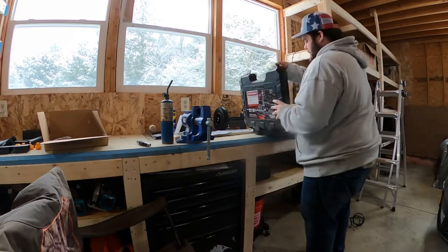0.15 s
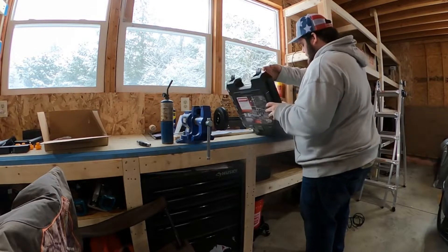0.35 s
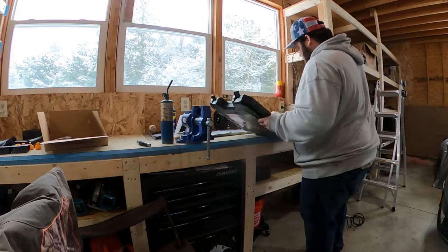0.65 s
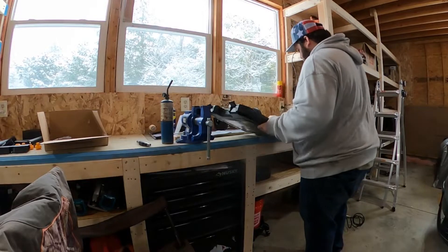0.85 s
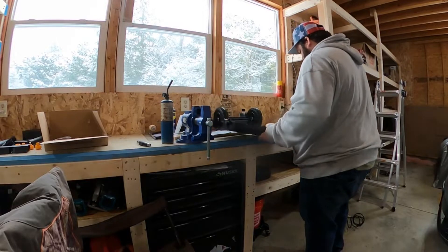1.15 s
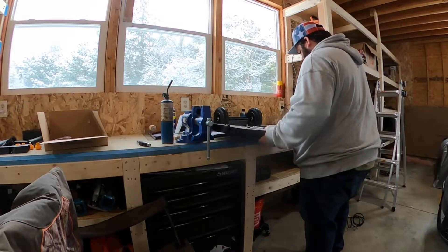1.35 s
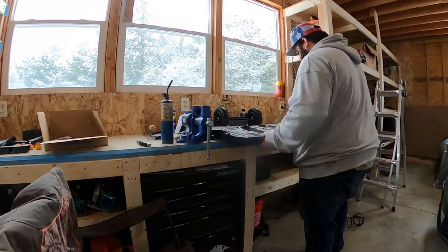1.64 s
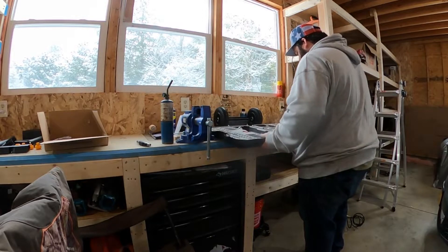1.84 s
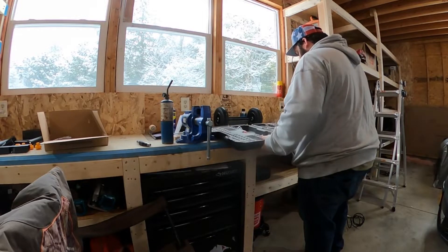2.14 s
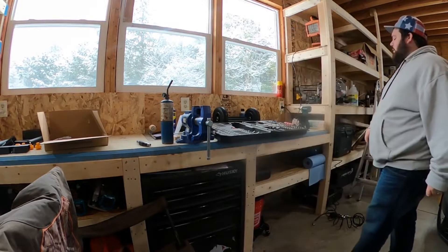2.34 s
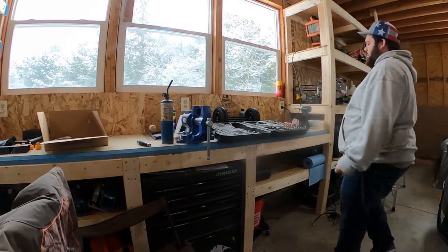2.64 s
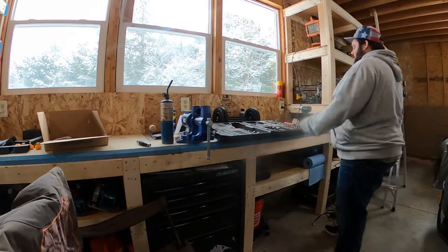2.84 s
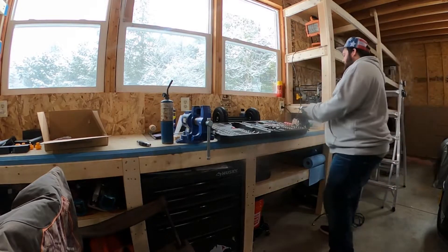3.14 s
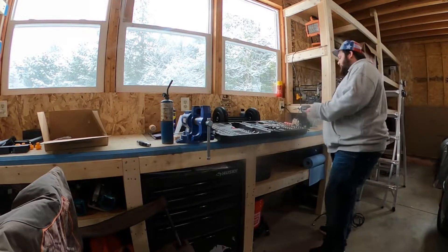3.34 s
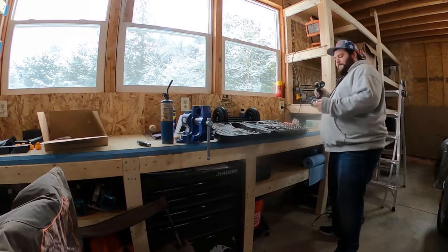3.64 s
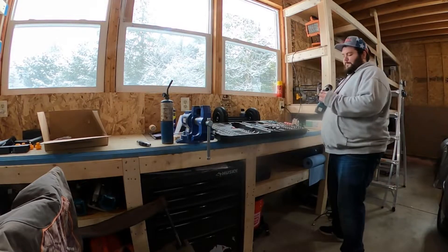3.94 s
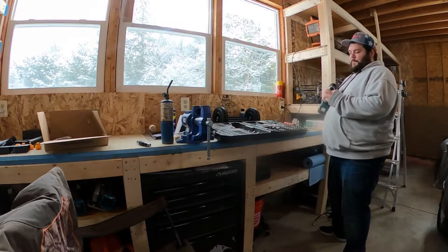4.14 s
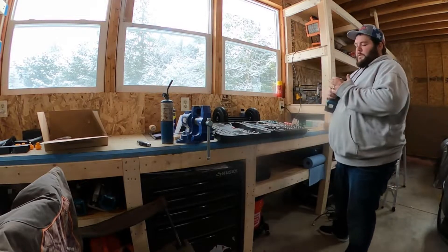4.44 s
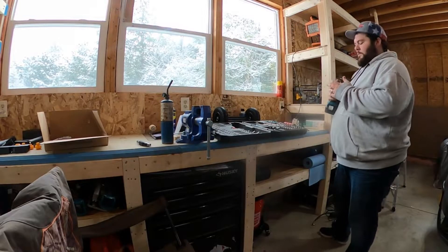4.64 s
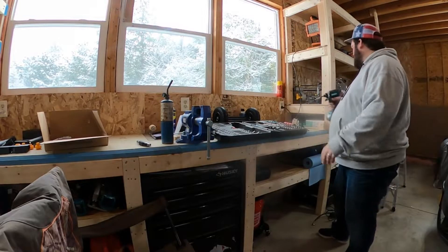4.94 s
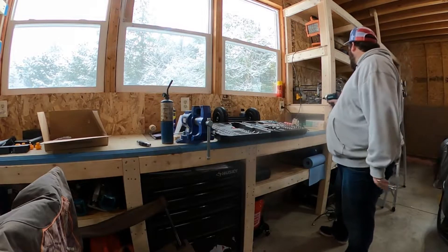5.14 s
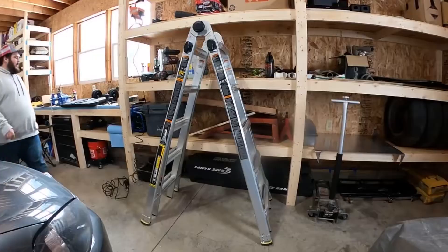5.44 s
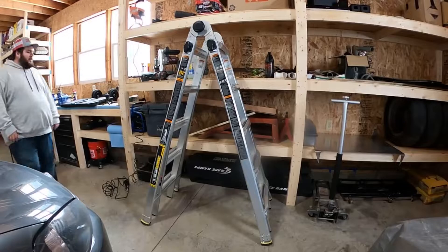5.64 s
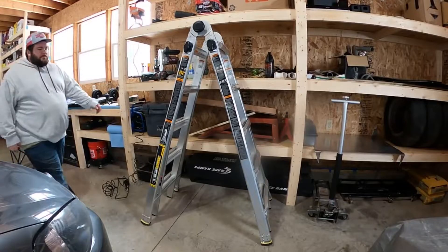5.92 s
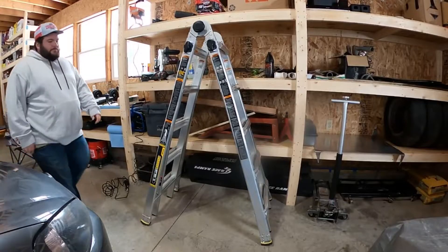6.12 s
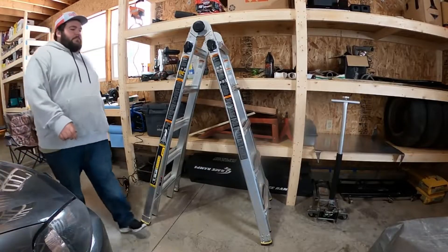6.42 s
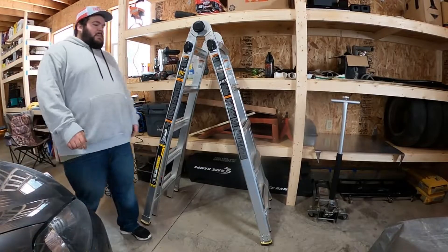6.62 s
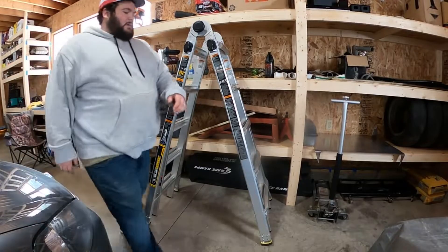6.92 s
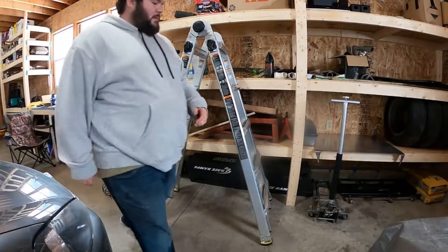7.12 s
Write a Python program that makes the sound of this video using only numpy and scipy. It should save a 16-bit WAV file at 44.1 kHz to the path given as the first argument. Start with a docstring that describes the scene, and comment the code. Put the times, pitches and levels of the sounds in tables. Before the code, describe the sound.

Close to a wooden workbench in a small garage, a hollow plastic case is dragged and bumped with a loose socket pinging. It is set down with clicks, clinks and a heavy knock. Cloth rustles, a tool is picked up, and a part snaps home with a loud, bright metallic crack. The ringing cuts off, and four gritty footsteps cross concrete with a hissing swish.

```python
"""Close by on a wooden workbench a plastic socket case is dragged and bumped, a loose socket ringing inside.
It is laid down, unlatched and opened to clinks; then a tool is picked up and a part snaps home in it.
Last, shoes scuff and step over the garage's concrete, with a long swish as the walker turns.
Contacts are noise bursts through resonant bodies, slides are grainy noise, steel and hollow rings are fading tones.
Three stretches follow one another; at the end of each, the ringing of the blows stops abruptly."""
import sys
import numpy as np
from scipy import signal
from scipy.fft import rfft, irfft, next_fast_len
from scipy.io import wavfile
from scipy.ndimage import uniform_filter1d, minimum_filter1d, map_coordinates

SR = 44100
rng = np.random.default_rng(int(sys.argv[2]) if len(sys.argv) > 2 else 0)


def waveform_to_disk(signal):
    """Save audio, clipped to [-1, 1], as 16-bit WAV at the path in sys.argv[1]."""
    frames = np.transpose(np.atleast_2d(signal))
    scaled = np.clip(frames, -1, 1) * 32767
    samples = np.round(scaled).astype(np.int16)
    wavfile.write(sys.argv[1], SR, samples)


N = 320646
HZ = np.fft.rfftfreq(SR, 1 / SR)
T = np.arange(SR) / SR  # one second, the longest single sound


def amp(db):
    """Decibels to gain."""
    return 10 ** (np.asarray(db) / 20)


def unit(x):
    """Scale to rms 1."""
    return x / np.sqrt(np.mean(x ** 2) + 1e-20)


def along(points, hz):
    """Read (Hz, value) points on a log frequency axis."""
    f, v = np.transpose(points)
    return np.interp(np.log(hz + 1), np.log(f + 1), v)


def octaves(hz, centre_hz):
    """Octaves above a centre, levelling off in the deep bass and the far treble."""
    return np.log2(np.clip(hz, 200, 10000) / centre_hz)


def wobble(rate, size=N):
    """A smooth random curve, rate knots a second."""
    knots = rng.standard_normal(int(size * rate / SR) + 4)
    return map_coordinates(knots, [np.arange(size) * rate / SR])


def filtered(x, response):
    """Multiply the spectrum of x by a response of frequency."""
    size = x.shape[-1]
    m = next_fast_len(size + 8192)
    return irfft(rfft(x, m) * response(np.fft.rfftfreq(m, 1 / SR)), m)[..., :size]


def colour(spectrum, modes, hz):
    """Gain of a body: its broad spectrum with resonances on top."""
    peaks_db = sum(db / (1 + (2 * (hz - f) / w) ** 2) for f, w, db in modes)
    return amp(along(spectrum, hz) + peaks_db)


def causal(gain):
    """The minimum-phase response with this gain: it rings only after the blow."""
    cepstrum = irfft(np.log(np.maximum(gain, gain.max() * 1e-5)))
    cepstrum[1:SR // 2] *= 2
    cepstrum[SR // 2 + 1:] = 0
    return np.exp(rfft(cepstrum))


def add(track, s, sound):
    """Lay a sound in at time s, up to the end of its stretch."""
    # stretches of the scene: start/s, end/s
    stretches = [(0, 2.2012), (2.2012, 5.2007), (5.2007, 7.28)]
    end = min(N, round(SR * next(b for a, b in stretches if s < b)))
    start = max(0, round(s * SR))
    part = sound[:, :end - start]
    track[:, start:start + part.shape[1]] += part


def blows(rows, spectrum, modes, grain, rattle_t60, crack, ring_db, echo_s, echo_db, direct_side_db, level_db):
    """Each contact is a crack and a short grainy rattle through the body, answered by a near wall and the room."""
    focus_db = 4.5  # per octave: a blow's colour falls away from the resonance it favours
    thud_hz = 380  # weight is felt below this
    track = np.zeros((2, N))
    for s, db, ring_hz, hardness_db, thud_db, room_db in rows:
        chatter = rng.standard_normal((2, SR)) * np.exp(grain * rng.standard_normal(SR))
        rattle = unit(chatter * amp(-60 * T / rattle_t60))
        snap = unit(rng.standard_normal((2, SR)) * np.exp(-T / 0.0016))
        late = np.maximum(T - echo_s, 0)
        wall = unit(rng.standard_normal((2, SR)) * (late > 0) * np.exp(-late / 0.013))
        # mid and side: the direct sound has its own side level, the room comes from all around
        contact = unit(rattle + crack * snap + amp(echo_db) * wall) * amp([[0], [direct_side_db]])
        room = amp(room_db) * garage()
        # where the body is struck favours one resonance; hardness brightens it and weight adds a thud
        body = colour(spectrum, [*modes, (ring_hz, ring_hz / 11, ring_db)], HZ)
        away = octaves(HZ, ring_hz)
        thud = thud_db / (1 + (HZ / thud_hz) ** 4)
        tilt = amp(hardness_db * away - focus_db * abs(away) + thud)
        sound = irfft(rfft(contact + room) * causal(unit(body * tilt)))
        add(track, s, amp(db + level_db) * sound)
    return track


def settling(count):
    """Rows of small random clacks as loose sockets shift in the tipping and landing case, rising in level."""
    start_s, end_s, first_db, last_db = 1.45, 2.12, -46, -40
    rows = []
    for u, p, v in rng.random((count, 3)):
        s = start_s + u * (end_s - start_s)
        db = first_db + u * (last_db - first_db) + 8 * (v - 0.5)
        rows.append((s, db, 2400 * 2 ** p, -1, 0, -9))
    return rows


def ringing(rows, modes, level_db):
    """The sharp part of each contact sets steel ringing, every mode at a new strength."""
    sharp_hz = 3000  # contacts well below this excite little ringing
    track, t = np.zeros((2, N)), T[:SR // 2]
    hz, db, t60 = np.transpose(modes)[:, :, None]
    tones = amp(db - 60 * t / t60) * np.exp(2j * np.pi * hz * t) * (1 - np.exp(-t / 0.001))
    for s, blow_db, ring_hz, *rest in rows:
        sharpness = 1 / np.hypot(1, (sharp_hz / ring_hz) ** 2)
        phase = np.exp(2j * np.pi * rng.random((2, len(modes))))
        strength = amp(rng.normal(0, 2.1, (2, len(modes)))) * phase
        add(track, s, sharpness * amp(blow_db + level_db) * (strength @ tones).real)
    return track


def socket():
    """A loose steel socket is touched and rings on in a few fading modes."""
    # modes of the socket: f/Hz, level/dB, t60/s
    steel = [(7560, -2, 0.26), (9700, -20, 0.45), (14340, -41, 0.33)]
    # touches of the socket: t/s, level/dB
    pings = [(0.410, -35.5), (0.446, -39), (0.56, -56)]
    track = np.zeros((2, N))
    for s, db in pings:
        ring = 0
        for hz, level, t60 in steel:
            ring = ring + amp(level - 60 * T / t60) * np.sin(2 * np.pi * (hz * T + rng.random((2, 1))))
        add(track, s, amp(db) * ring * (1 - np.exp(-T / 0.0028)))
    return track


def booms(rows, width_share, rise_s):
    """Single resonances swell and fade, their phase drifting."""
    track = np.zeros((2, N))
    for s, hz, db, t60 in rows:
        width = 25 + width_share * hz  # sets both the phase drift and the band
        drift = np.cumsum(rng.standard_normal((2, SR)), axis=1) * np.sqrt(width / SR)
        tone = np.sin(2 * np.pi * hz * T + 2 * drift)
        tone = filtered(tone, lambda f: 1 / (1 + ((f - hz) / (2 * width)) ** 4))
        add(track, s, tone * amp(db - 60 * T / t60) * (1 - np.exp(-T / rise_s)))
    return track


def stroke(length_s):
    """Envelope of a sliding movement: attack, hold, release."""
    attack_s, release_s = 0.022, 0.085  # release: time to fall to 1/e
    return np.clip(T / attack_s, 0, 1) * np.exp(-np.maximum(T - length_s, 0) / release_s)


def rubbing(rows, spectrum, modes, grain_db, grain_rate, level_db):
    """Sliding contact catches and slips in small grains, each stroke with its own brightness."""
    track = np.zeros((2, N))
    for s, length_s, db, bright_db in rows:
        grains_db = grain_db * wobble(grain_rate, size=SR) + 0.52 * wobble(900, size=SR)
        slips = rng.standard_normal((2, SR)) * amp(grains_db)
        rub = filtered(slips, lambda hz: colour(spectrum, modes, hz) * amp(bright_db * octaves(hz, 1000)))
        add(track, s, amp(db + level_db) * unit(rub) * stroke(length_s))
    return track


def footfalls(count):
    """Rows of contacts: each shoe rolls from heel to toe and cracks a few grains of grit on the way."""
    # footfalls: t/s, level/dB, time from heel to toe/s, extra weight/dB
    steps = [(5.365, -35, 0.063, -3), (5.884, -33.5, 0.069, 4.5), (6.436, -32.5, 0.055, -2),
             (6.958, -31, 0.08, 7)]
    # heel, ball and toe: share of the roll, level/dB re the step, resonance f/Hz,
    # hardness/(dB per octave), thud/dB before the extra weight, room/dB
    roll = [(0, 1.5, 276, -1.5, -8, -2.5), (0.35, -3.5, 613, -1.5, -13.5, 0.5),
            (0.998, -1.5, 620, -4, -8, -5.5)]
    crunch_db, crunch_hz = -12, 880  # grit: level re the step, middle of its two-octave range
    rows = []
    for s, db, roll_s, weight_db in steps:
        for share, part_db, hz, hardness_db, thud_db, room_db in roll:
            rows.append((s + share * roll_s, db + part_db, hz, hardness_db, thud_db + weight_db, room_db))
        for u, p in rng.random((count, 2)):
            rows.append((s + (0.1 + u) * roll_s, db + crunch_db, crunch_hz * 2 ** (2 * p - 1), -1.5, -8, -8))
    return rows


def swish():
    """A narrow, hissing slide in two resonances that swells and sinks as the walker turns."""
    # resonances of the slide: f/Hz, width/Hz, level/dB
    slide_modes = [(3000, 1300, 0), (4360, 520, 13.5)]
    broad = [(500, -36), (3000, 4.5), (5000, -7.5), (12000, -24), (15000, -55)]  # f/Hz, level/dB
    start_s, length_s, peak_db = 5.62, 0.3, -41.5
    track = np.zeros((2, N))
    hiss = filtered(rng.standard_normal((2, SR)), lambda hz: colour(broad, slide_modes, hz))
    swell = np.sin(np.pi * np.minimum(T / length_s, 1)) ** 2
    add(track, start_s, unit(hiss) * swell * amp(peak_db + 0.72 * wobble(90, size=SR)))
    return track


def garage():
    """A fresh mid and side room tail of rms 1; each frequency dies at its own speed."""
    # reverberation of the garage: f/Hz, t60/s
    decay = [(100, 0.42), (300, 0.38), (1200, 0.56), (5000, 0.54), (8000, 0.43), (14000, 0.22)]
    hz, t, z = signal.stft(rng.standard_normal((2, SR)), SR, nperseg=256)
    fading = z * amp(-60 * t / along(decay, hz)[:, None])
    tail = signal.istft(fading, SR, nperseg=256)[1][:, :SR]
    return unit(tail * (1 - np.exp(-T / 0.0057)))


def air(level_db, rumble_db):
    """The still garage: faint hiss over a deep rumble that rises and falls, with a low thump near 2.9 s."""
    # colour of the hiss: f/Hz, level/dB
    hiss_colour = [(20, -8), (90, -12.5), (180, -2.5), (600, -9.5), (900, -17.5), (1300, -9), (6000, -20),
                   (10000, -31), (15000, -63.5)]
    # course of the deep rumble: t/s, level/dB
    rumble = [(0.0, -65), (0.32, -59), (0.77, -77), (1.9, -58), (2.85, -75), (2.89, -49), (3.1, -77),
              (5.34, -80.5), (5.41, -70), (5.71, -84), (5.91, -65), (6.34, -73.5), (6.46, -62.5),
              (6.86, -76), (6.94, -67), (7.27, -62.5)]
    deep_colour = [(12, -22.0), (25, 3), (65, -2.5), (130, -41.5)]  # f/Hz, level/dB
    hiss = unit(filtered(rng.standard_normal((2, N)), lambda hz: amp(along(hiss_colour, hz))))
    deep = unit(filtered(rng.standard_normal((2, N)), lambda hz: amp(along(deep_colour, hz))))
    course_db = np.interp(np.arange(N) / SR, *np.transpose(rumble))
    return amp(level_db + 1.5 * wobble(1.97)) * hiss + amp(course_db + rumble_db) * deep


def spread(x, side_db):
    """Mid and side to left and right; the close microphone pair keeps the bass near mono."""
    # width of the pair: f/Hz, level of side re mid/dB before the layer's own side_db
    width = [(50, -26), (130, -14.5), (300, -16.5), (700, -26), (1200, -9), (2400, -6.5), (4400, -11.5),
             (8000, -5.5), (13000, -11)]
    mid, side = x[0], filtered(x[1], lambda hz: amp(along(width, hz) + side_db))
    return np.array([mid + side, mid - side])


def scene():
    """The case is straight ahead of the microphones; hands, feet and the garage's own air are more diffuse."""
    # the case bumps the bench: t/s, level/dB before the layer's level_db, favoured resonance f/Hz,
    # hardness/(dB per octave), thud/dB, room/dB
    knocks = [(0.074, -26.5, 920, -3, -10, 5), (0.163, -24.5, 600, -1.5, 9, -1),
              (0.184, -16, 193, -1.5, -11.5, -2), (0.215, -21.5, 274, -2, 4, -3),
              (0.261, -25.5, 606, -0.5, 15, -2), (0.315, -27.5, 252, -6.5, -2, 0),
              (0.378, -21, 208, -4, -6.5, -2.5), (0.507, -24, 656, 3, 20, 2.5),
              (0.526, -14.5, 832, -1, -21, -8.5), (0.555, -19.5, 620, -6.5, -22, -8),
              (0.597, -25.5, 553, -5.5, -12, -4), (0.715, -40, 1470, 0, -21, -7),
              (0.996, -52, 159, -5, 17, -5), (1.106, -44, 166, -2, 8, -23), (1.124, -43, 157, 4.5, 18, 5),
              (1.154, -32, 527, 1.5, 11.5, -2), (1.84, -39, 191, 1.5, 3, 1), (1.886, -17, 321, 4, 18.5, -2),
              (2.441, -38.5, 170, 4.5, 8, -4), (2.487, -35, 174, 9.5, 25, 3.5),
              (2.596, -33.5, 546, -2, -2, -7.5), (2.868, -37, 603, -1.5, -5, -4)]
    # latches, lid and sockets click: same columns
    clicks = [(0.6699, -44, 1260, 5, 2, -8), (1.2936, -52, 1200, 2, -3, -1), (1.3239, -38, 1320, -1, 1, 4),
              (1.3506, -40.5, 2580, 10.5, 8, -8), (1.4426, -28.5, 1350, -1.5, -19, -6.5),
              (1.468, -28.5, 2200, -4, -17, -5.5), (1.5502, -25.5, 3830, -4.5, -12.5, -3.5),
              (1.6943, -29, 5370, -1.5, 0, -2.5), (1.7725, -19.5, 6020, -4, -21, -5),
              (1.8292, -17, 3500, -2.5, -3, -6.5), (1.953, -20.5, 2150, -6.5, -6.5, -4),
              (2.1863, -19.5, 1930, 2.5, -1, -4), (2.4306, -34, 7000, 14, 45, -5),
              (2.6193, -38.5, 1440, 1, 30, -1), (2.8661, -30.5, 4050, -2, 20, 1),
              (2.8745, -30, 2240, 1.5, 22, 0.5), (3.2923, -35.5, 3130, 2.5, 22.5, -6)]
    # parts of the hand tool touch, snap home and rebound: same columns
    snaps = [(3.880, -29.5, 1110, -4.5, 11, -10), (3.895, -23, 5840, -4.5, 9, -1.5),
             (3.907, -22, 5040, -3, 0, -4.5), (3.978, -37.5, 2180, -5, 5.5, -8),
             (4.014, -34, 4500, -7, -11.5, -6.5), (4.393, -40.5, 7860, -6.5, 2, 5),
             (4.417, -25.5, 2030, 0, 14, -2.5), (4.423, -21.5, 654, -3, -4, -8.5),
             (4.420, -5, 1133, 2, 6, -4), (4.425, -7.5, 9180, 4.5, 6.5, -9.5),
             (4.4345, -13, 9400, 3, 2.5, -5.5), (5.159, -38.5, 2400, -4.5, 23.5, 5)]
    # broad colours of case, latch, tool, sole, cloth and grit: f/Hz, level/dB
    case_colour = [(59, -49), (100, -36.5), (192, -0.5), (236, -10.5), (274, -3), (304, -6), (570, -10),
                   (1290, -4), (2270, -12.5), (7050, -26.5), (7670, -28.5), (8340, -33), (15000, -59)]
    latch_colour = [(59, -50), (100, -16), (279, 0), (558, -12), (1260, -8), (1700, -6.5), (2130, -5.5),
                    (2420, -4.5), (3390, -4.5), (5260, -7.5), (6090, -12.5), (6910, -4.5), (8170, -13),
                    (10300, -18.5), (15000, -41)]
    tool_colour = [(59, -74), (100, -33.5), (370, -8), (530, -7), (936, -12.5), (1310, -8), (1520, -7.5),
                   (1690, -4), (2130, -3.5), (3390, -7), (4660, -8), (7000, -5), (9340, -11.5),
                   (12000, -9.5), (15500, -34.5)]
    sole_colour = [(35, -48), (60, -10), (116, -15), (167, 5), (201, 2), (437, -3), (478, -7), (755, -5.5),
                   (808, -12), (1250, -8), (6900, -15), (9940, -22), (14000, -76)]
    cloth_colour = [(59, -54.5), (100, -34.5), (155, 4.5), (236, -5), (291, -6), (425, 4.5), (482, -2),
                    (831, -3.5), (942, -7.5), (1160, 1), (2420, -7), (3320, -12), (4540, -10),
                    (10100, -28.5), (15000, -55.5)]
    grit_colour = [(59, -40), (100, -17), (162, 7), (416, 3), (462, 7), (524, 1.5), (780, -8), (1190, 0),
                   (2130, -6), (4450, -10.5), (4940, -11), (6220, -9.5), (10100, -26.5), (13800, -46),
                   (15000, -62)]
    # resonances of the hollow case and of the latches: f/Hz, width/Hz, level over the rest/dB
    shell = [(200, 3.7, -8.5), (315, 55, -0.5), (488, 18, 5), (585, 116, 6.5), (785, 30, 5.5)]
    clasp = [(1300, 150, 4.8), (2030, 110, 2.9), (2980, 500, 2.2), (6130, 420, 10.4)]
    # resonances of the tool's housing, and the microphone's treble drop near 11 kHz: same columns
    tool_modes = [(3720, 600, 3), (10500, 990, 4.5), (11830, 2200, -16)]
    # steel that rings along with the clicks and with the tool: f/Hz, level/dB, t60/s
    socket_steel = [(2410, -8, 0.4), (2747, -4, 0.4), (2927, -2, 0.4), (3344, -1, 0.35), (3489, 0, 0.35),
                    (3793, 0, 0.35), (4635, -4, 0.31), (6111, -3, 0.3), (6400, -4, 0.35), (6900, -6, .3),
                    (8800, -12, .3)]
    tool_steel = [(1380, -8, .41), (1713, 1, 0.42), (1817, -6.5, .34), (2100, 0, 0.57), (2202, 14.5, 0.34),
                  (2360, 1.5, .22), (3580, -0.5, .38), (5250, -5, .35), (6400, 10.5, .3), (7375, -17, .35),
                  (8200, -6.5, 0.21), (8600, -14, 0.09), (9300, -20.5, 0.083), (9006, -9, 0.17),
                  (9154, -20, 0.15), (9668, -15.5, .25)]
    # hollow rings of case, bench and floor after the heavier blows: t/s, f/Hz, level/dB, t60/s
    hollow_rings = [(1.885, 311, -20.5, 0.51), (1.887, 482, -28.5, 0.36), (2.441, 185, -33.5, 0.16),
                    (2.598, 447, -37, 0.41), (5.371, 439, -35, 0.54)]
    # faint squeaks and a low groan that swell as things shift: same columns
    squeaks = [(2.205, 1312, -42.5, 0.61), (3.295, 128.7, -37.5, 0.36), (5.02, 2620, -51, 0.24),
               (6.72, 4060, -25, 0.041)]
    # the case scrapes over the bench: t/s, length/s, level/dB before level_db, brightness/(dB per octave)
    drags = [(0, 0.12, -32.5, -0.5), (0.13, 0.14, -37, 3.5), (0.28, 0.13, -43.5, 4.5),
             (0.39, 0.089, -39.5, 0.5), (0.52, 0.037, -34.5, -3.5), (0.64, 0.061, -56, 1)]
    # hands and sleeves rub over case and tool: same columns
    rustles = [(0.82, 0.17, -52.5, 1.5), (1.16, 0.13, -63, -5), (1.36, 0.2, -43, 2), (1.58, 0.37, -45, 2.5),
               (1.83, 0.6, -36, -1), (2.203, 0.41, -51.5, 2), (2.55, 0.043, -38, 2), (2.87, 0.04, -36, 1),
               (3.0, 0.52, -50, 4), (3.44, 0.33, -49.5, 4), (4.0, 0.11, -49.5, -0.5), (4.17, 0.59, -53, 4)]
    # shoes and trouser legs scuff: same columns
    scuffs = [(5.27, 0.11, -51.5, -1.5), (5.38, 0.13, -49, -0.5), (5.49, 0.04, -38.5, 2.5),
              (5.58, 0.2, -44.5, 1), (5.69, 0.15, -42, 0.5), (5.91, 0.28, -49.5, 0), (6.25, 0.36, -58, 3.5),
              (6.53, 0.094, -42, 0), (6.65, 0.43, -50, 1), (6.95, 0.28, -46.5, 0)]

    case = blows(knocks, case_colour, shell, grain=1.0, rattle_t60=0.078, crack=0.17, ring_db=6.5,
                 echo_s=0.0081, echo_db=-3.5, direct_side_db=-37, level_db=-24.5)
    case += blows(clicks, latch_colour, clasp, grain=0.75, rattle_t60=0.077, crack=0.4, ring_db=6.0,
                  echo_s=0.0065, echo_db=-7.0, direct_side_db=3.5, level_db=-22.5)
    case += blows(settling(count=12), latch_colour, clasp, grain=1.0, rattle_t60=0.019, crack=0.76, ring_db=3.5,
                  echo_s=0.016, echo_db=-3, direct_side_db=0, level_db=-26)
    case += ringing(clicks, socket_steel, level_db=-18.5) + socket()
    case += booms(hollow_rings, width_share=0.054, rise_s=0.0013)
    case += booms(squeaks, width_share=0.1, rise_s=0.026)
    case += rubbing(drags, case_colour, shell, grain_db=1.0, grain_rate=94, level_db=-3)

    tool = blows(snaps, tool_colour, tool_modes, grain=0.43, rattle_t60=0.031, crack=0.55, ring_db=10.5,
                 echo_s=0.0029, echo_db=0, direct_side_db=-3.5, level_db=-23.5)
    tool += ringing(snaps, tool_steel, level_db=-35)

    hands = rubbing(rustles, cloth_colour, [], grain_db=1, grain_rate=60, level_db=-6.0)

    feet = blows(footfalls(count=4), sole_colour, [], grain=1.0, rattle_t60=0.042, crack=1.25, ring_db=1.5,
                 echo_s=0.007, echo_db=0.0, direct_side_db=-14.5, level_db=-22)
    feet += rubbing(scuffs, grit_colour, [], grain_db=0.5, grain_rate=160, level_db=-3.0) + swish()

    still = air(level_db=-63, rumble_db=0.0)
    near = spread(case, side_db=-11.5) + spread(tool, side_db=-0.5) + spread(hands, side_db=0.5)
    return near + spread(feet, side_db=-0.5) + spread(still, side_db=13)


def limiter(x, ceiling_db, hold_s, release_db):
    """Gain falls at once when the 10 ms level passes the ceiling, holds, then recovers by release_db a second."""
    power = np.abs(uniform_filter1d(np.mean(x ** 2, axis=0), size=441))
    over_db = np.maximum(10 * np.log10(power + 1e-12) - ceiling_db, 0)
    half = int(hold_s * SR / 2)
    held_db = -minimum_filter1d(-over_db, 2 * half + 1, origin=half)
    ramp_db = release_db * np.arange(N) / SR
    return x * amp(ramp_db - np.maximum.accumulate(held_db + ramp_db))


def record(dry):
    """The camera limits loud blows and cuts steeply above its band limit."""
    top_hz = 15600
    limited = limiter(dry, ceiling_db=-14, hold_s=0.13, release_db=62)
    return filtered(limited, lambda hz: 1 / (1 + (hz / top_hz) ** 200))


dry = scene()
out = record(dry)
waveform_to_disk(out)
```